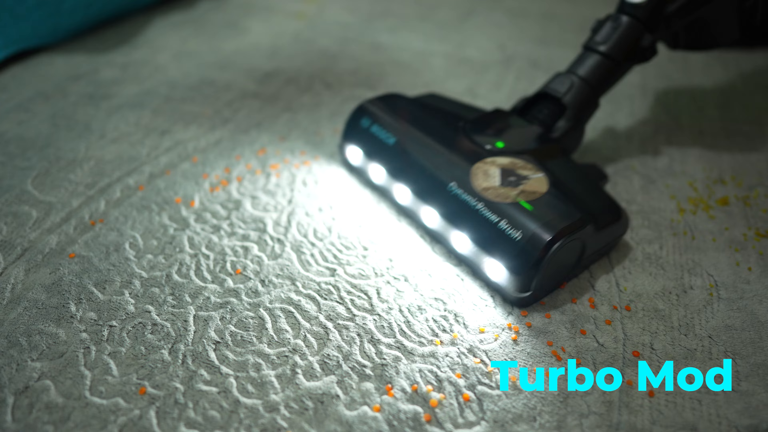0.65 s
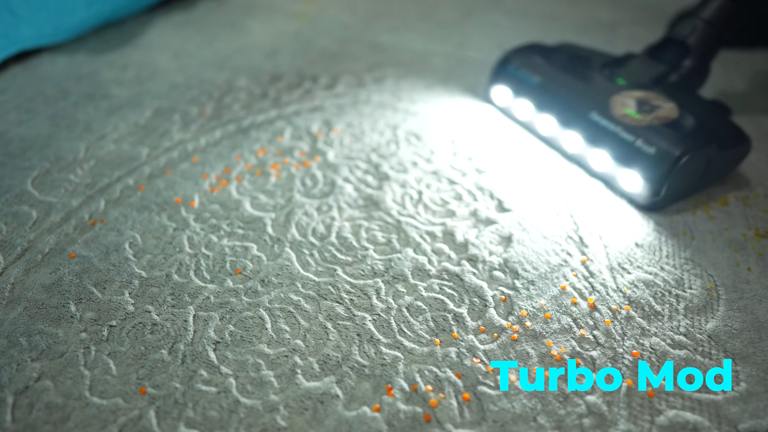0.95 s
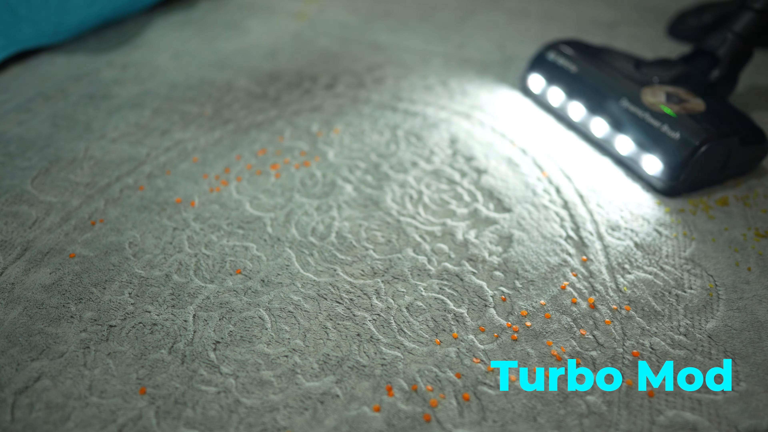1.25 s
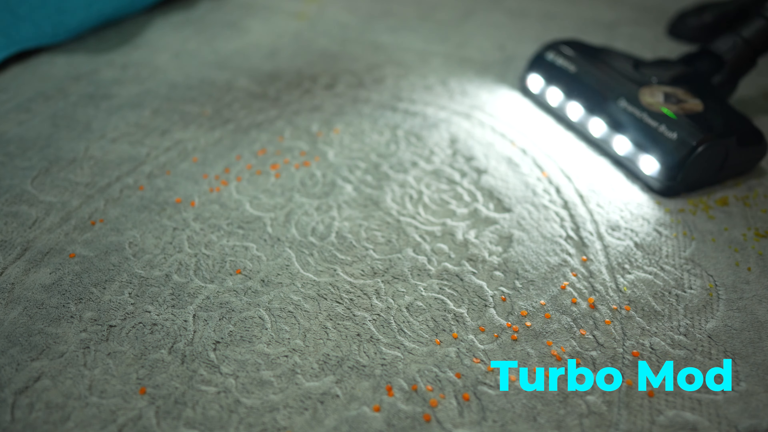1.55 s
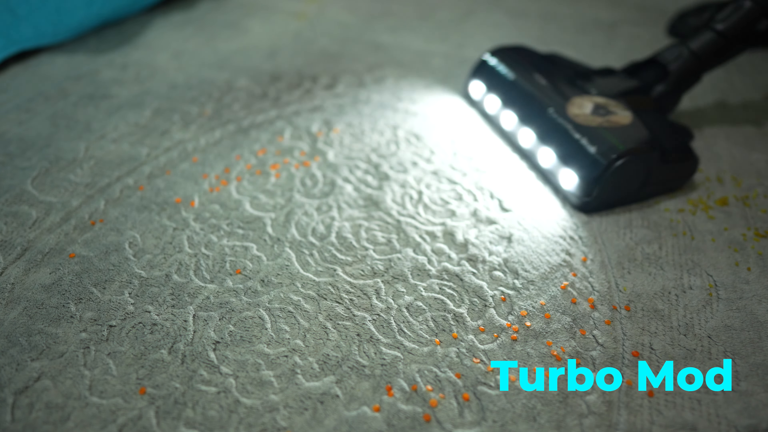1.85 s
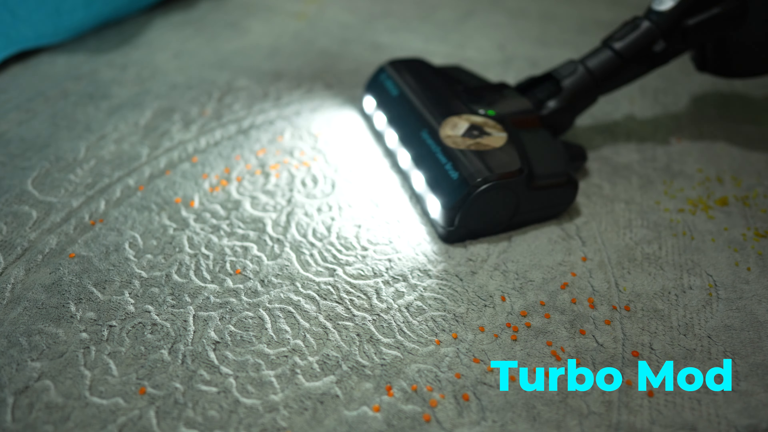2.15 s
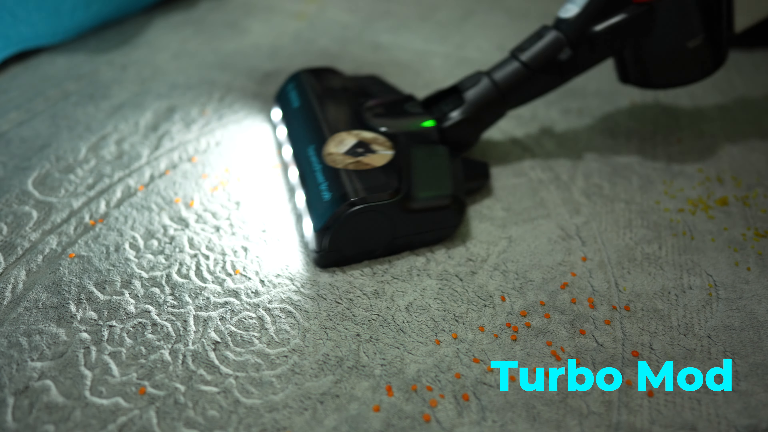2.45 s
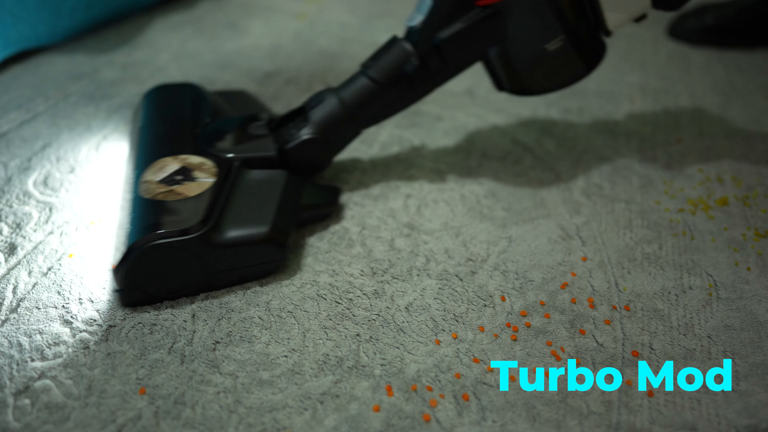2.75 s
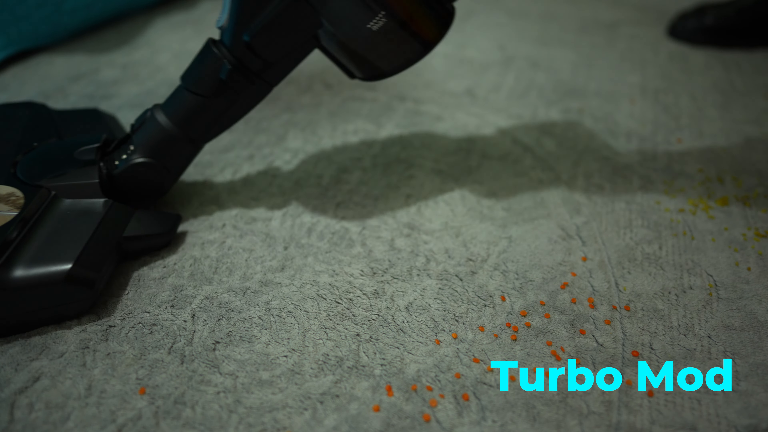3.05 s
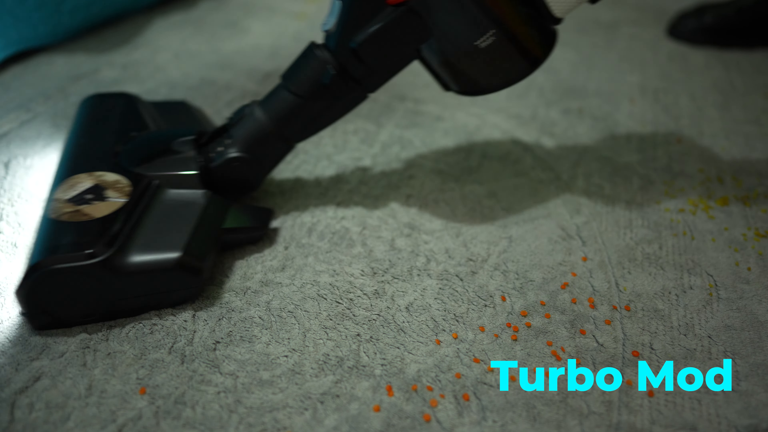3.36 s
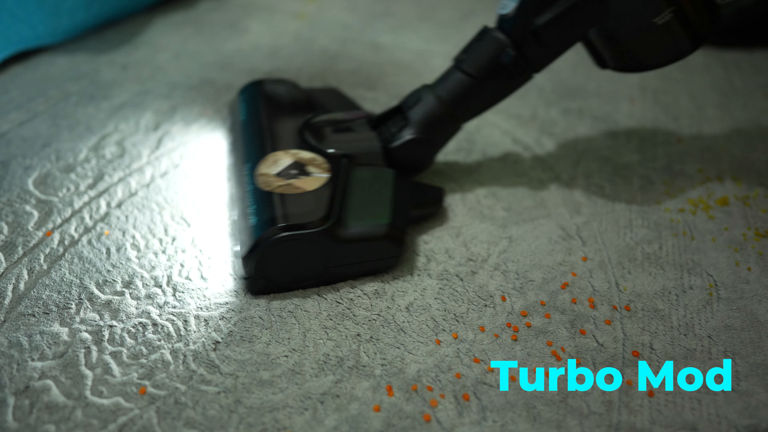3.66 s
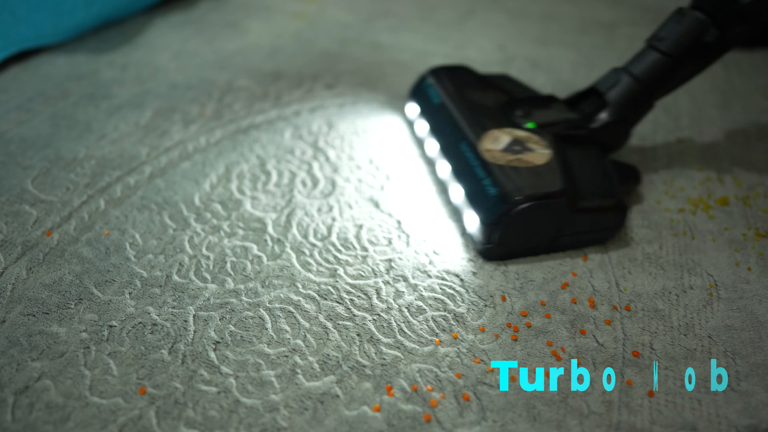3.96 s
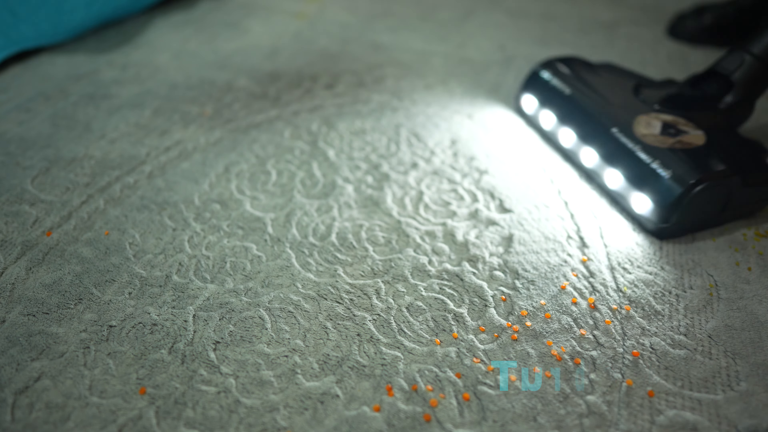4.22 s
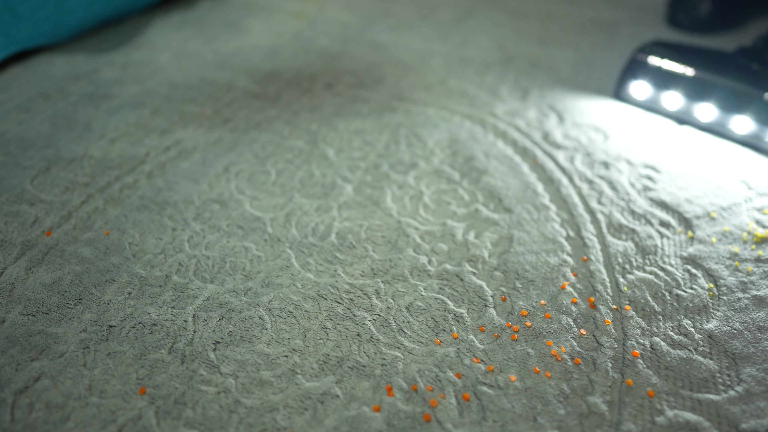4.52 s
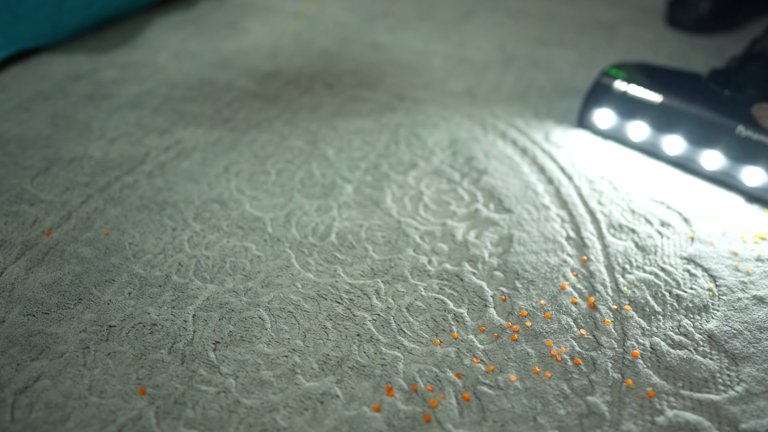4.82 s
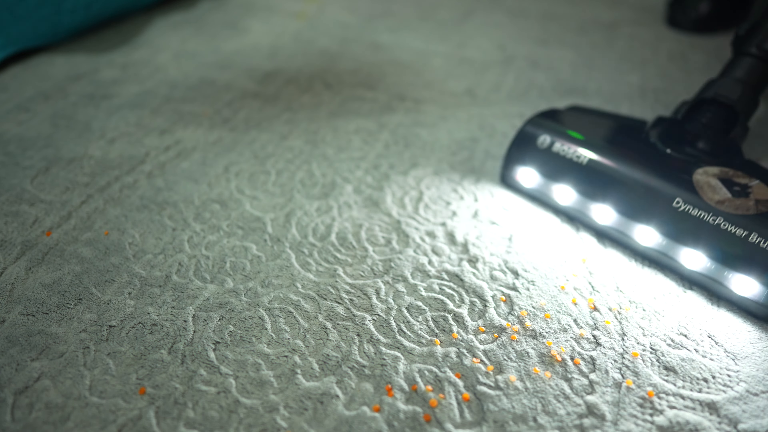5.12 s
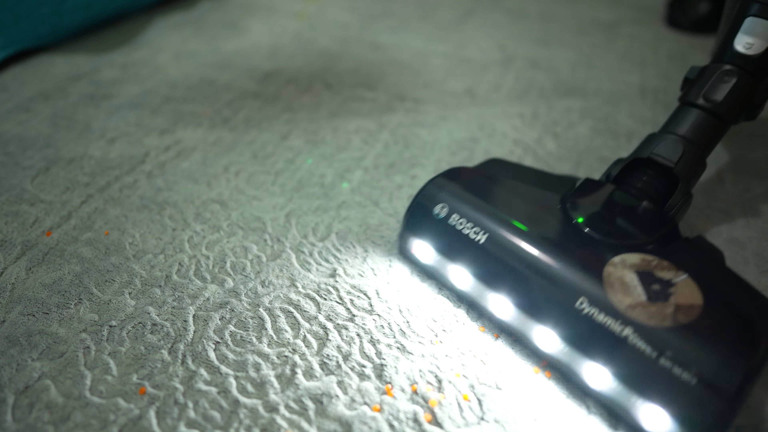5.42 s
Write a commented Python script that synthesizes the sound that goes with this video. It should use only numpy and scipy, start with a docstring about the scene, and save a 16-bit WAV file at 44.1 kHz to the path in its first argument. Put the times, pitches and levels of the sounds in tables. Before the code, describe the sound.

A cordless stick vacuum runs on high power, pushed back and forth over a carpet close to the microphone. Its bright, airy suction hiss swells and eases with each stroke above a thin, wavering motor whine. Crumbs and fine grit tick up the tube throughout, and faint, very high whistles come and go. The floor head bumps softly about a second in.

```python
"""On a carpet, close to a stereo microphone, a cordless stick vacuum on high power is pushed to and fro.
Turbulent air hisses in under the floor head, and edge tones whistle where a gap narrows.
The fan motor whines at harmonics of its shaft speed, which follows the load.
Crumbs and grit tick up the tube by impact; the head's resonances rumble softly as it bumps over the pile."""
import sys
import numpy as np
from scipy import signal
from scipy.fft import rfft, irfft, next_fast_len
from scipy.io import wavfile
from scipy.ndimage import uniform_filter1d, map_coordinates

SR = 44100
rng = np.random.default_rng(int(sys.argv[2]) if len(sys.argv) > 2 else 0)


def transcribe(signal):
    """Save signal, clipped to [-1, 1], as a 16-bit WAV file at the path in sys.argv[1]."""
    frames = np.atleast_2d(signal).T
    limited = np.clip(frames, -1, 1)
    pcm = np.round(limited * 32767).astype(np.int16)
    wavfile.write(sys.argv[1], SR, pcm)


N = 369558

# air drawn under the head, swelling with each stroke: (time [s], level [dB])
SUCTION_LEVEL = [(0, -42.5), (.3, -34), (.78, -40), (1.06, -37.5), (1.5, -43), (1.85, -46.5), (2.45, -41.5),
                 (3.05, -40), (3.25, -38), (3.63, -39.5), (4.05, -42), (4.4, -43.5), (4.54, -41.5),
                 (4.68, -45.5), (5.1, -44), (5.42, -47), (5.76, -43), (6.25, -42.5), (6.85, -42),
                 (7.0, -43.5), (7.11, -42.5), (7.27, -46.5), (7.62, -45), (7.93, -50), (8.1, -42.5),
                 (8.38, -44.5)]
USUAL_SUCTION_DB = -43
# place of the floor head: (time [s], lag of the left microphone [ms], left minus right level [dB])
HEAD_PATH = [(0, 0.038, -7), (.56, 0.053, -5.5), (1.2, 0.092, -5), (2.1, 0.0765, -6.5), (2.68, 0.04, -7),
             (3.14, -0.012, 0), (3.66, 0.044, -5.5), (4.22, 0.091, -5.5), (5.1, .083, -5),
             (5.75, 0.067, -7), (6.8, 0.093, -6.4), (7.6, 0.089, -4), (8.38, 0.087, -5.5)]
# spectrum of the rushing air: (frequency [Hz], relative level [dB])
AIR_SPECTRUM = [(1300, -5.5), (1650, -9), (2300, -4), (2750, -6), (4200, -5), (5500, -4), (6800, -6),
                (8500, -4), (11200, -4.5), (12500, -1.5), (14000, 1.5), (15500, 4.5)]
# hiss arriving straight from the head: (frequency [Hz], share of power [0-1])
DIRECT_SHARE = [(900, 0.92), (1300, 0.54), (1900, 0.82), (4000, 0.23), (10000, 0.39), (15000, 0.33)]
# the fizz is dullest with the head centred and brightens as it swings aside:
# (lag of the left microphone [ms], gain [dB])
FIZZ_GAIN = [(0, -6), (.05, -4.5), (.09, -1.7)]
# the cavity under the head sets the lower edge of the hiss: (time [s], frequency [Hz])
CAVITY_EDGE = [(0, 1010), (.56, 1130), (1.15, 1034), (1.45, 1410), (1.75, 1270), (2.08, 1170), (2.35, 1220),
               (3.2, 947), (3.86, 1030), (4.22, 993), (5.1, 1200), (5.75, 1060), (6.16, 1086), (6.78, 960),
               (7.72, 1197), (8.38, 1080)]
# a hollow in the low part of the hiss: (time [s], depth [dB])
HOLLOW_DEPTH = [(0, 0), (1.4, 1.5), (2.3, 6), (2.8, 4), (3.4, -1.5), (4.4, -1.5), (5.4, 4.5), (6.1, 0),
                (8.38, -0.5)]
HOLLOW_HZ, HOLLOW_WIDTH_HZ = 1620, 520
# echoes from nearby surfaces: (delay [ms], added delay per microphone lag [ms/ms], gain [0-1])
REFLECTIONS = [(2.9, 21.5, 0.15), (6.3, -26.5, 0.04)]
# the fan slows and speeds up with its load: (time [s], change of shaft speed [Hz])
SHAFT_DRIFT = [(0, -6.5), (.2, -5.5), (.66, -4.5), (.78, -1), (1.15, -1.28), (1.42, 7), (1.57, 1.5),
               (2.15, 1.05), (2.4, 3), (2.56, -6), (2.78, -7.5), (2.92, 2), (3.17, 0.96), (3.3, -8.5),
               (3.78, -5.5), (3.93, -0.5), (4.68, -2.35), (4.9, 7), (5.03, 0), (5.6, -1.33), (5.9, 1.7),
               (6.36, -1.5), (6.57, -6), (6.75, -1), (6.93, -10), (7.2, -1), (7.48, -3.5), (7.85, 4.5),
               (8.38, 0.5)]
# hum at the shaft speed, from the rotor's unbalance: (time [s], level [dB])
UNBALANCE_LEVEL = [(0, -56.5), (.5, -86), (2.0, -76), (2.2, -63), (3.13, -53.5), (3.7, -61.5), (4.6, -80),
                   (5.3, -70), (6.15, -57.5), (6.35, -66), (6.76, -66), (7.1, -77), (8.38, -84)]
# whine at four times the shaft speed: (time [s], level [dB])
FOURTH_LEVEL = [(0, -43.5), (.7, -51), (1.0, -45.5), (1.35, -51), (1.6, -48.5), (1.9, -55), (2.1, -50),
                (2.8, -53), (3.13, -44), (3.65, -54.5), (4.22, -46), (4.5, -54), (5.25, -51), (5.72, -50.5),
                (5.98, -54), (7.05, -51), (7.45, -52.5), (7.82, -47), (8.38, -55)]
# the eighth harmonic flares, mostly when the fan labours: (time [s], rise [dB], half length [s])
EIGHTH_FLARES = [(0, 15.5, 0.26), (.78, 9, .08), (2.657, 17.5, 0.11), (3.07, 5, .07), (3.7, 9, 0.18),
                 (5.786, 10, 0.081), (6.53, 10.5, 0.044), (6.782, 10.5, 0.074)]
# whistles between head and carpet: (base level [dB], pitch path [(time [s], frequency [Hz]), ...])
EDGE_TONES = [(-50, [(1.65, 13350), (1.77, 13430), (1.8, 13780), (1.85, 13760), (1.87, 13420),
              (1.925, 13330), (1.99, 12320), (2.38, 12220)]), (-43, [(2.4, 11620), (2.5, 11340),
              (2.66, 11280)]), (-50, [(2.8, 11250), (3.02, 11850), (3.21, 11380)]), (-48, [(4.63, 13400),
              (4.815, 13400), (4.875, 12350), (4.99, 12150)]), (-50, [(5.3, 11580), (5.54, 11350),
              (5.7, 11520), (5.97, 11600), (6.09, 12050)]), (-48.5, [(7.73, 11450), (7.79, 13100),
              (7.825, 13260), (7.865, 13740), (7.905, 13780), (7.94, 13220), (8.05, 13240)])]
# a narrower gap whistles higher and louder: (frequency [Hz], gain [dB])
GAP_GAIN = [(12300, -0.5), (13300, 9)]
# larger crumbs hitting the tube: (time [s], peak level before filtering and panning [dB])
CRUMB_HITS = [(0.627, -18), (0.6914, -19), (3.606, -16.5), (3.7284, -19), (4.2114, -28), (5.942, -27),
              (6.2866, -19), (6.6613, -18), (7.1394, -21)]
# spectrum of the fine grit: (frequency [Hz], relative level [dB])
GRIT_SPECTRUM = [(900, -62), (2000, -13), (6000, -11), (11000, -1), (15000, -1)]
# the head bumps and drags over the pile: (time [s], rms level [dB], half length [s], upper edge [Hz])
SHOVES = [(0.45, -73, 0.41, 202), (0.998, -56.5, 0.044, 900), (1.046, -51.5, 0.046, 520),
          (2.6, -81, 0.087, 80), (3.504, -81, 0.13, 75), (3.895, -73, 0.032, 80), (4.19, -75, 0.098, 90),
          (4.522, -64, 0.058, 1210), (4.87, -76, 0.13, 150), (6.57, -72, 0.074, 64.2),
          (7.248, -79.5, 0.2, 90), (8.076, -68, 0.064, 260)]
# resonances of the floor head and wand: (frequency [Hz], bandwidth [Hz], level [dB])
SHELL_MODES = [(72.6, 16, -1.5), (115, 17, 3.5), (168, 40, -3.5), (268, 21, 3), (322, 24, -2),
               (430, 50, -5.5), (512, 52, -9), (670, 190, 1)]
# spectrum of the room's low rumble: (frequency [Hz], relative level [dB])
ROOM_SPECTRUM = [(20, -7), (60, -9.5), (85, -6.5), (120, 0.5), (174, -3), (250, -2.5), (335, 0.5),
                 (420, -3), (800, -3.5), (1050, -3), (1700, -70)]


def suction(hiss_db, patchy_db, flutter_db, edge_order, lip_db):
    """Turbulence at the floor head radiates broadband noise, heard directly and by way of the room."""
    f, t, (jet, left, right) = signal.stft(rng.standard_normal((3, N)), SR, nperseg=1024)
    hz = f[:, None] + 1
    flow_db = airflow(t)
    lag_ms, pan_db = curves(HEAD_PATH, t)
    # the duct's throat and the fizz at the lips swell less with the airflow than the rest
    throat_db = -0.29 * flow_db * along([(3200, 0.96), (5800, 0.076)], hz)
    fizz_db = -0.095 * flow_db + np.interp(lag_ms, *np.transpose(FIZZ_GAIN))
    colour_db = along(AIR_SPECTRUM, hz) + throat_db + fizz_db * along([(9500, 0), (14000, 1)], hz)
    # the cavity under the head resonates just above the edge and radiates little below it
    edge_ratio = hz / curves(CAVITY_EDGE, t)[0]
    highpass = 1 / np.sqrt(1 + (1.092 / edge_ratio) ** edge_order)
    colour_db += lip_db / (1 + ((edge_ratio - 1.18) / 0.08) ** 2)
    colour_db -= curves(HOLLOW_DEPTH, t)[0] * np.exp(-(2 * (hz - HOLLOW_HZ) / HOLLOW_WIDTH_HZ) ** 2)
    # eddies brighten patches of the spectrum for a moment
    patches = uniform_filter1d(rng.standard_normal(jet.shape), size=6, axis=0)
    eddies = unit(uniform_filter1d(patches, size=14, axis=1))
    colour_db += patchy_db * eddies * along([(2500, 0.78), (7000, 0.59)], hz)
    share = along(DIRECT_SHARE, hz)
    direct = jet * np.exp(1j * np.pi * hz * np.array([-lag_ms, lag_ms])[:, None] / 1000)
    diffuse = np.array([left, right])
    pair = (np.sqrt(share) * direct + np.sqrt(1 - share) * diffuse) * echo_ripple(hz, lag_ms)
    # the left microphone is shaded most in the low part of the hiss
    shade_db = along([(900, -4), (1650, -7.5), (2200, -6), (3200, 0.5), (10000, 0.5), (15000, -1.5)], hz)
    pair = pair * panned(pan_db + shade_db) * highpass * amp(hiss_db + flow_db + colour_db)
    flutter = amp(flutter_db * (wobble(30) + wobble(110) / 2))
    return signal.istft(pair, SR, nperseg=1024)[1][:, :N] * flutter


def airflow(t=None):
    """Flow noise grows with the flow, given here in dB above its usual strength."""
    return curves(SUCTION_LEVEL, t)[0] - USUAL_SUCTION_DB


def echo_ripple(hz, lag_ms):
    """Comb filtering: echoes interfere with the hiss, and the comb slides as the head moves."""
    ripple = 1
    for delay_ms, slide, gain in REFLECTIONS:
        delay_s = (delay_ms + slide * lag_ms + rng.normal(0, .12, (2, 1, 1))) / 1000
        # carpet and furniture return little treble
        ripple = ripple + gain / (1 + (hz / 4800) ** 2) * np.exp(-2j * np.pi * hz * delay_s)
    return np.abs(ripple)


def motor(nominal_hz, jitter_hz, flutter_db):
    """Periodic forcing: the fan sounds at its shaft speed and at the fourth and eighth harmonics."""
    shaft_hz = nominal_hz + curves(SHAFT_DRIFT)[0] + jitter_hz * wobble(70)
    flare_db = sum(db * swell(s, half) for s, db, half in EIGHTH_FLARES)
    # the handle moves through the standing waves of the room, so the whine flutters
    fourth_db = curves(FOURTH_LEVEL)[0] + flutter_db * wobble(22)
    eighth_db = -51.5 + 0.11 * airflow() + flare_db + flutter_db * wobble(32)
    unbalance = tone(shaft_hz, curves(UNBALANCE_LEVEL)[0], scatter=0.23, fade_rate=2.7)
    fourth = tone(4 * shaft_hz, fourth_db, scatter=0.45, fade_rate=11, pan_db=-1.5)
    eighth = tone(8 * shaft_hz, eighth_db, scatter=0.66, fade_rate=15, pan_db=1)
    return unbalance + fourth + eighth


def whistle(attack_s, release_s):
    """Edge tone: air crossing a narrow gap oscillates at a pitch that shakes with the turbulence."""
    t = np.arange(N) / SR
    hz, = curves([point for _, pitch in EDGE_TONES for point in pitch])
    gate = np.zeros(N)
    for db, pitch in EDGE_TONES:
        start, end = pitch[0][0], pitch[-1][0]
        gate += amp(db) * np.clip(np.minimum((t - start) / attack_s, (end - t) / release_s), 0, 1)
    shaken_hz = hz + 45 * wobble(260) + 35 * wobble(25)
    gain_db = along(GAP_GAIN, hz) + 2.8 * wobble(55)
    return gate * tone(shaken_hz, gain_db, scatter=0.5, fade_rate=9.1)


def tone(hz, level_db, scatter, fade_rate, pan_db=0):
    """Multipath interference: a tone from the moving cleaner fades differently at each microphone."""
    lag_ms, head_pan_db = curves(HEAD_PATH)
    direct = np.exp(1j * np.pi * hz * np.array([-lag_ms, lag_ms]) / 1000)
    reflected = unit(np.array([wobble(fade_rate) + 1j * wobble(fade_rate) for _ in range(2)]))
    paths = (direct + scatter * reflected) * panned(head_pan_db + pan_db)
    paths /= np.sqrt(np.mean(np.abs(paths) ** 2, axis=0))
    return amp(level_db) * np.sqrt(2) * np.real(paths * np.exp(2j * np.pi * np.cumsum(hz) / SR))


def crumbs(small_count, t60_s):
    """Damped impacts on the plastic tube: a few large crumbs, and small ones that ride on the airflow."""
    suction_db = curves(SUCTION_LEVEL)[0]
    small = [(when * N / SR, suction_db[int(when * N)] + 12 + 6 * size ** 2)
             for when, size in rng.random((small_count, 2))]
    t = np.arange(SR // 50) / SR
    ticks = np.zeros((2, N + SR))
    for s, db in list(CRUMB_HITS) + small:
        tick = amp(-60 * t / t60_s) * rng.standard_normal((2, len(t)))
        start = round(s * SR)
        ticks[:, start:start + len(t)] += amp(db) * tick / np.abs(tick).max()
    in_tube = filtered(ticks[:, :N], lambda hz: amp(along([(1000, -40), (2000, -4), (6000, 0)], hz)))
    return in_tube * panned(curves(HEAD_PATH)[1])


def grit(grains_per_s, spread_db, t60_s, usual_db):
    """Shot noise: fine grains strike the tube at random and merge into a sputter of tiny ticks."""
    hits = (rng.random(N) < grains_per_s / SR) * amp(spread_db * np.clip(rng.standard_normal(N), -2, 2))
    decay = amp(-60 * np.arange(SR // 50) / SR / t60_s)
    bursts = signal.fftconvolve(hits, decay)[:N]
    ticks = filtered(bursts * rng.standard_normal((2, N)), lambda hz: amp(along(GRIT_SPECTRUM, hz)))
    return unit(ticks) * amp(usual_db + airflow()) * panned(curves(HEAD_PATH)[1])


def bumps():
    """Forced vibration: each shove shakes the head unevenly; a gentle one excites only its low modes."""
    jolts = amp(1.4 * wobble(45))
    rumble = np.zeros(N)
    for s, db, half, top_hz in SHOVES:
        shove = swell(s, half)
        ringing = filtered(rng.standard_normal(N), lambda hz: shell(hz) / (1 + (hz / top_hz) ** 4))
        shake = shove * jolts * ringing
        rumble += amp(db) * shake * np.linalg.norm(shove) / np.linalg.norm(shake)
    return rumble


def shell(hz):
    """Modal response: the head's resonances add in power; so small a body radiates little deep bass."""
    power = sum(amp(db) ** 2 / (1 + (2 * (hz - centre) / width) ** 2)
                for centre, width, db in SHELL_MODES)
    return np.sqrt(power) * hz ** 2 / (hz ** 2 + 45 ** 2)


def background():
    """Noise floor: a faint rumble in the room, and the little hiss that spills below the cavity's edge."""
    rumble = amp(-76.5 + 1.3 * wobble(5)) * noise(ROOM_SPECTRUM)
    spill = np.array([noise([(80, -19), (250, -16), (450, -8), (850, 8), (1300, -8.5)]) for _ in range(2)])
    return rumble + spill * amp([[-90.5], [-78]]) * amp(.4 * airflow())


def amp(db):
    """Amplitude ratio of a level in decibels."""
    return 10 ** (np.asarray(db) / 20)


def unit(x):
    """Normalisation to rms 1."""
    return x / np.sqrt(np.mean(np.abs(x) ** 2) + 1e-20)


def along(points, hz):
    """Interpolation of (frequency [Hz], value) points on a logarithmic axis."""
    f, v = np.transpose(points)
    return np.interp(np.log(hz + 1), np.log(f + 1), v)


def curves(rows, t=None):
    """Linear interpolation of each column after the time, at times t (every sample by default)."""
    s, *cols = np.transpose(rows)
    return [np.interp(np.arange(N) / SR if t is None else t, s, c) for c in cols]


def wobble(rate):
    """Random modulation: a smooth curve through rate knots a second."""
    return map_coordinates(rng.standard_normal(int(N * rate / SR) + 4), [np.arange(N) * rate / SR])


def swell(s, half):
    """Hyperbolic secant envelope that peaks at 1 at time s."""
    return 1 / np.cosh(np.clip((np.arange(N) / SR - s) / half, -20, 20))


def filtered(x, response):
    """Linear filtering: the spectrum of x times a frequency response."""
    m = next_fast_len(N + SR // 2)
    return irfft(rfft(x, m) * response(np.fft.rfftfreq(m, 1 / SR)), m)[..., :N]


def noise(spectrum):
    """Spectral shaping of white noise by (frequency [Hz], level [dB]) points, at rms 1."""
    return unit(filtered(rng.standard_normal(N), lambda hz: amp(along(spectrum, hz))))


def panned(pan_db):
    """Constant-power panning: left and right gains for a level difference."""
    pair = amp([pan_db / 2, -pan_db / 2])
    return pair / np.sqrt(np.mean(pair ** 2, axis=0))


def scene():
    """Superposition: the pressures of all sources add at the two microphones."""
    air = suction(hiss_db=-31.5, patchy_db=2.3, flutter_db=0.65, edge_order=17.8, lip_db=1.5)
    whine = motor(nominal_hz=1138, jitter_hz=0.25, flutter_db=2.5)
    whistles = whistle(attack_s=0.028, release_s=0.044)
    ticks = crumbs(small_count=100, t60_s=0.027)
    sputter = grit(grains_per_s=350, spread_db=6.5, t60_s=0.004, usual_db=-46)
    return air + whine + whistles + ticks + sputter + bumps() + background()


def record(dry):
    """Band limiting: an ideal low-pass filter removes the highest treble."""
    return filtered(dry, lambda hz: hz < 15780)


dry = scene()
out = record(dry)
transcribe(out)
```